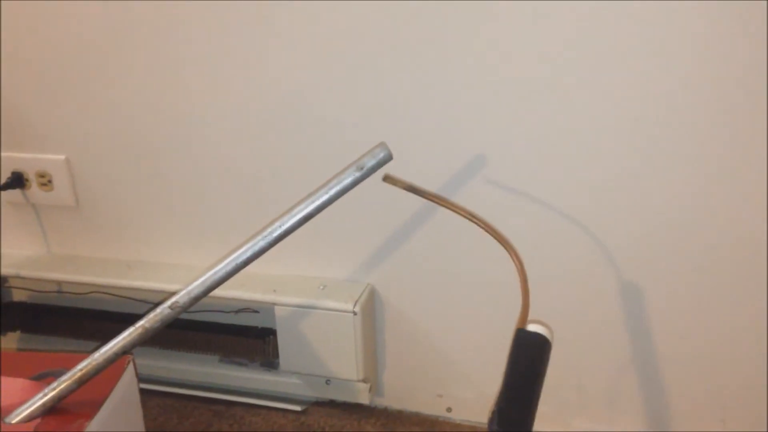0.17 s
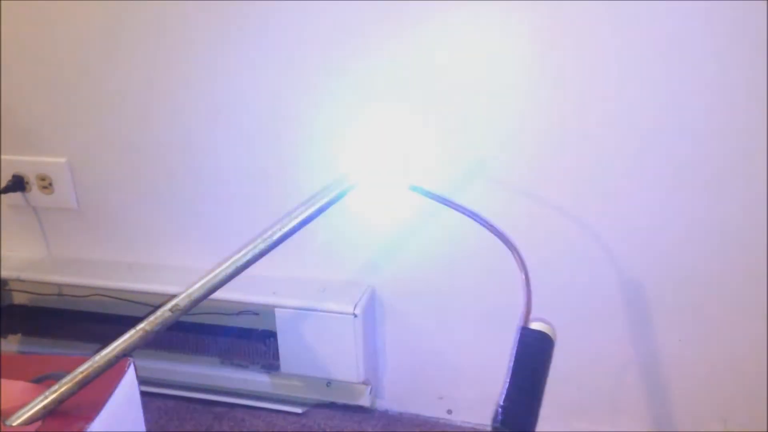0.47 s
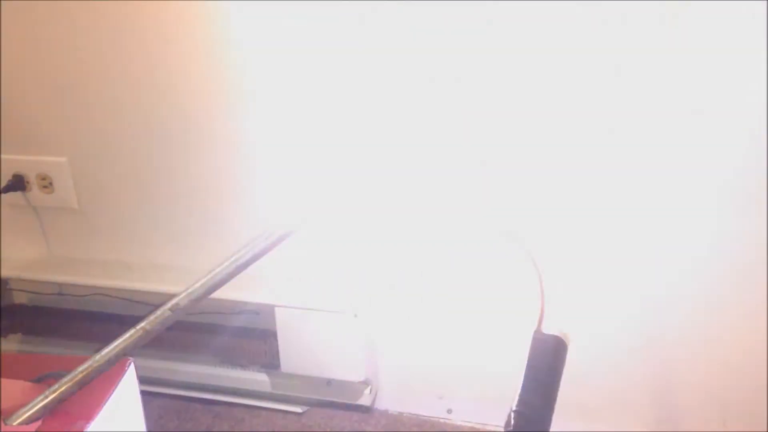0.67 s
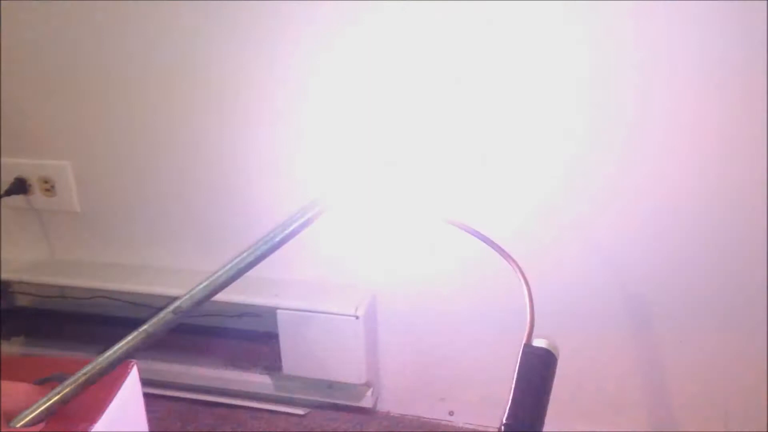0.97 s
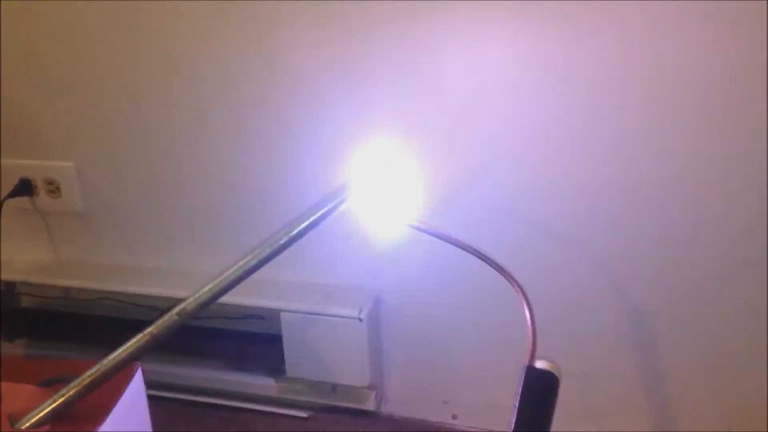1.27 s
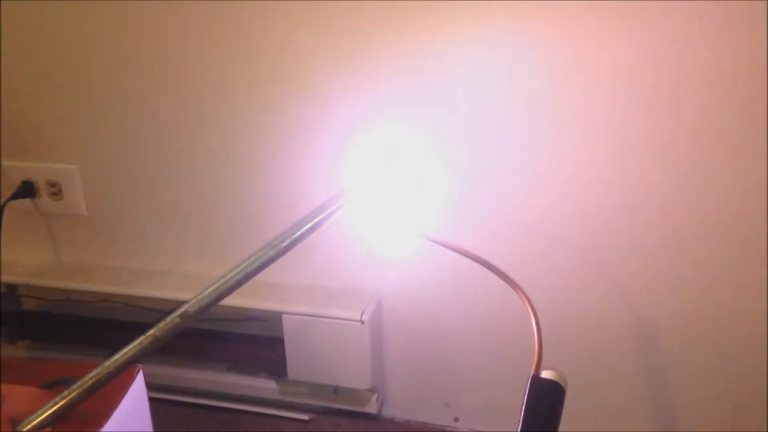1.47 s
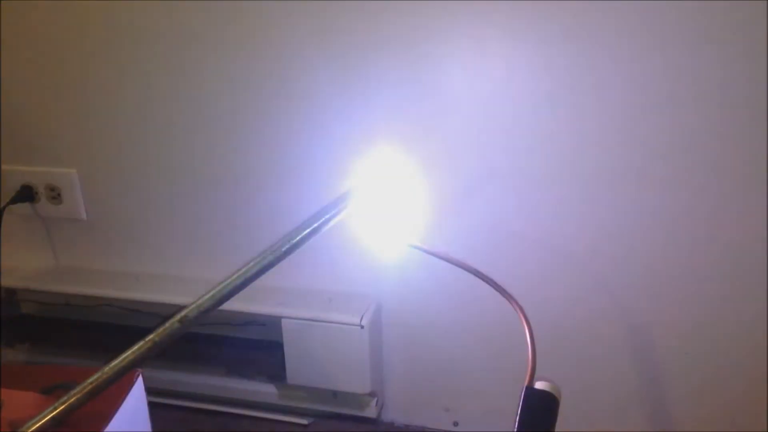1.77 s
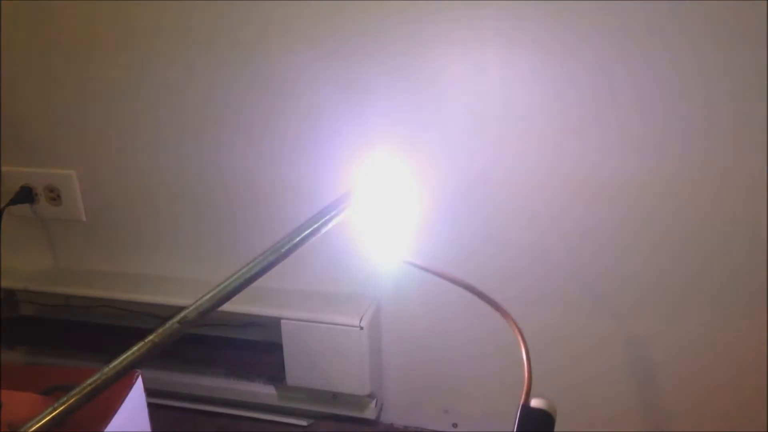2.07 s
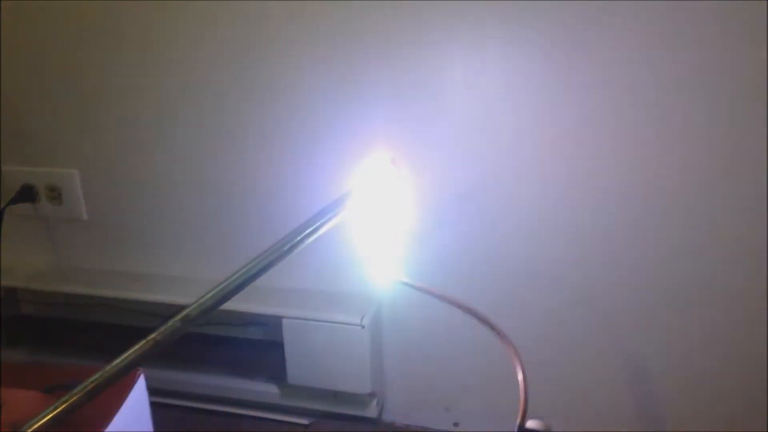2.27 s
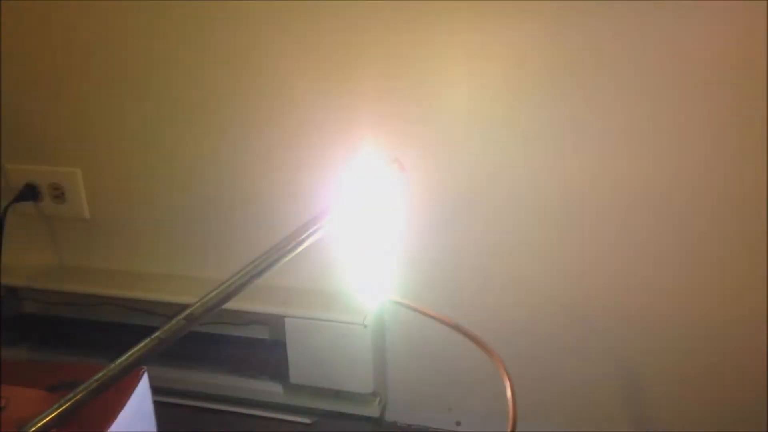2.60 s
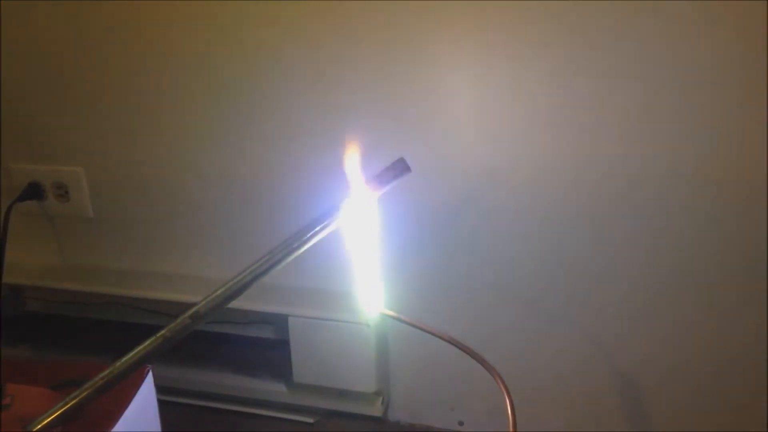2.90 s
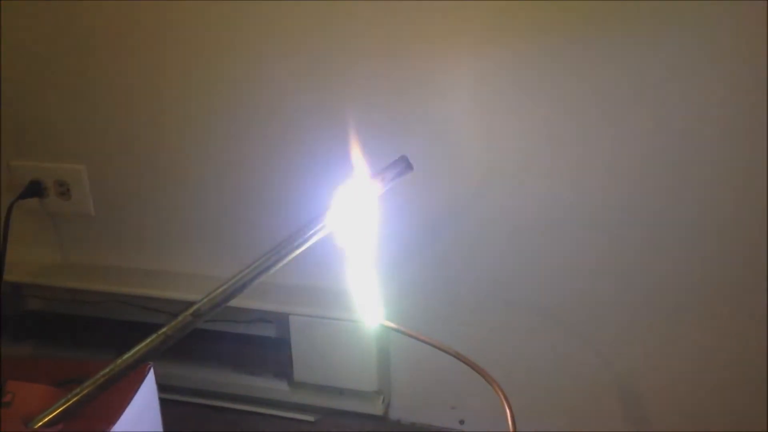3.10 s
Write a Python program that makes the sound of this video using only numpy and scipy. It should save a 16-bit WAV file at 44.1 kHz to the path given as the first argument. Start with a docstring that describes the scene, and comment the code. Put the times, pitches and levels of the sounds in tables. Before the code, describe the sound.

Electric arc buzzing at twice the mains rate, starting faintly after a metallic tick and fizz, soon broken by irregular sharp snaps, swelling loud and fuller to the end; close, mono, in a small hard-walled room.

```python
"""Over quiet room noise and a low transformer hum, a bent wire taps a metal rod: a tick, then a short ring.
The tips sizzle and a high-voltage arc strikes, one pressure pulse per mains half cycle, mirrored by a wall.
Hard relights soon snap, each trailed by churning air, and the arc takes hold with one soft sputter.
As wire and rod part, the arc grows louder and its pulses wider, while the hum swells under load.
Pulses are arctangent shapes, air is coloured noise, the ring is decaying sines; a small room adds its tail."""
import sys
import numpy as np
from scipy import signal
from scipy.fft import rfft, irfft
from scipy.io import wavfile

SR = 44100
rng = np.random.default_rng(int(sys.argv[2]) if len(sys.argv) > 2 else 0)


def store_wav(level_fs):
    """Save 16-bit WAV to argv[1]."""
    pcm = np.round(np.clip(np.atleast_2d(level_fs), -1, 1) * 32767)
    wavfile.write(sys.argv[1], SR, pcm.T.astype(np.int16))


N = 143325

MAINS_HZ = 60
STRIKE_S = .4714

# Strength of the arc, before the trims below: t/s, level/dB
ARC_LEVEL = [(.47, -48.5), (.53, -49), (.6, -37.5), (.66, -32.5), (.74, -33.5), (.78, -27), (.81, -29),
             (.91, -27), (1.03, -29.5), (1.1, -27), (1.16, -29), (1.2, -25.5), (1.25, -26.5), (1.3, -22),
             (1.35, -27), (1.49, -24.5), (1.55, -20), (1.61, -22.5), (1.64, -20), (1.69, -22),
             (1.77, -19.5), (1.84, -20.5), (1.88, -18.5), (1.95, -19.5), (2.05, -20), (2.22, -16),
             (2.27, -14), (2.35, -15), (2.45, -22), (2.6, -15.5), (2.72, -14.5), (2.82, -15.5), (3.02, -16),
             (3.05, -13.5), (3.09, -14.5), (3.24, -14)]
ARC_TRIM_DB, ARC_SCATTER_DB, POLARITY_DB, JITTER_MS = -.5, 1.1, .5, .03
# The arc lengthens and moves; width and edge are before random spread:
# t/s, pulse width/ms, pulse edge/ms, lag of the wall echo/ms
ARC_GROWTH = [(.5, 0.066, 0.11, 1.534), (.9, 0.14, 0.068, 1.5), (1.2, 0.4, 0.046, 1.474),
              (1.9, 0.48, 0.11, 1.49), (2.2, 0.57, 0.11, 1.52), (2.5, 0.63, 0.079, 1.645),
              (2.9, 0.67, 0.13, 1.593), (3.2, 0.8, 0.12, 1.666)]
WALL_GAIN = .62
# Hard relights; level is before the trim: t/s, level/dB, spike edge/ms
HARD_RELIGHTS = [(.705, -21.5, 0.081), (.755, -21, 0.13), (.772, -22, 0.068), (.788, -27, 0.036),
                 (.805, -45, 0.034), (.822, -32, 0.021), (.838, -21, 0.043), (.872, -27, 0.035),
                 (.888, -25.5, 0.042), (.905, -24, 0.034), (.922, -16, 0.08), (.938, -41, 0.057),
                 (.955, -29.5, 0.027), (.972, -18.5, 0.061), (1.088, -18.5, 0.16), (1.188, -21.5, 0.076),
                 (1.338, -16.5, 0.054), (1.355, -25, 0.054), (1.405, -21, 0.045), (1.505, -21, 0.084),
                 (1.538, -26, 0.1), (1.555, -15.5, .085), (1.588, -23, 0.08), (1.755, -17, 0.1),
                 (1.772, -19.5, 0.051), (1.805, -15.5, .055), (1.972, -15.5, 0.041), (2.005, -25, 0.049),
                 (2.022, -19.5, 0.046), (2.038, -13.5, 0.08), (2.072, -25, .055), (2.088, -16.5, 0.06),
                 (2.105, -23.5, 0.052), (2.122, -15.5, 0.077), (2.138, -18.5, 0.08), (2.272, -13.5, 0.068),
                 (2.288, -17.5, .075), (2.322, -24, 0.12), (2.63, -19.5, 0.14), (2.705, -15.5, 0.11),
                 (2.755, -13.5, 0.061)]
SNAP_TRIM_DB = -7.5
# Colour that the nearby surfaces give the arc: f/Hz, gain/dB
SURFACE_COLOUR = [(50, -48), (120, -1.5), (240, -8.5), (360, -4), (480, 2.5), (600, 0.5), (720, -.5),
                  (840, -3.5), (960, 13.5), (1080, 3.5), (1320, 5), (1560, -5.5), (1680, 9), (2100, 4.5),
                  (2400, 0.5), (2760, -8), (3250, 7), (3600, -2.5), (4400, 0.5), (7000, -1.5), (15000, 5.5)]

# Spectrum of the hot air churning after a hard relight: f/Hz, level/dB
CHURN_COLOUR = [(100, -12), (300, -15.5), (550, 4), (1300, 1), (1600, 5), (2000, 2), (2700, -8),
                (3400, -9.5), (5000, -20), (15000, -48)]
# Spectrum of the slow noise that makes the churn ragged: f/Hz, level/dB
FLICKER_COLOUR = [(20, 6.5), (150, -4), (600, -25), (15000, -78)]
CHURN_DB, CHURN_DECAY_S, CHURN_FLICKER_DB = -15.5, .035, 2.5  # level relative to the listed relight

# Sizzle at the tips: t/s, level/dB
SIZZLE_LEVEL = [(.438, -74), (.447, -50), (.465, -54), (.473, -46.5), (.52, -35.5), (.57, -43), (.65, -45),
                (.71, -51), (1.1, -53.5), (1.45, -54.5), (1.9, -53), (2.4, -54.5), (3.24, -56)]
# Spectrum of the sizzle: f/Hz, level/dB
SIZZLE_SPECTRUM = [(500, -7), (2000, -8), (5000, -5), (8000, -4.5), (12000, -3.5), (15000, 2)]
SIZZLE_LAG_MS, SIZZLE_WIDTH_MS = 3.3, 1.25
SIZZLE_WEAK, SIZZLE_STEADY = .22, .51  # opposite-polarity flare and constant part; main flare is 1

# Spectrum of the turbulent hot air: f/Hz, level/dB
FLAME_COLOUR = [(25, -24), (55, -8), (110, -6), (250, -13), (600, -8), (1500, -18), (4000, -35),
                (15000, -50)]
FLAME_DB = -32  # relative to ARC_LEVEL
# Spectrum of the sputter's puff: f/Hz, level/dB
PUFF_COLOUR = [(30, -6), (140, 1), (400, -13), (3000, -32)]
SPUTTER_S, SPUTTER_HISS_DB, SPUTTER_PUFF_DB = .740, -37, -41
HISS_WIDTH_S, PUFF_WIDTH_S = .002, .008

# Ringing modes of rod and wire, before TAP_DB: f/Hz, level/dB, t60/s
RING_MODES = [(111.5, -12.5, 0.38), (292, -9, 0.2), (404, -6, 0.055), (560, -3, 0.14), (610, -14, 0.058),
              (885, -18, 0.092), (5600, -31, .1), (6550, -35, .1), (9530, -26, 0.17), (10500, -29, 0.13)]
# Spectrum of the contact tick: f/Hz, level/dB
TICK_COLOUR = [(200, -7), (1500, 2), (3000, -1.5), (5500, -1), (9000, -3), (15000, -17)]
TAP_S, TAP_DB, TICK_DB, TICK_DECAY_S = .369, -32, -36, .0018

# Colour of the reflections: f/Hz, gain/dB
REVERB_COLOUR = [(100, -14), (500, -14), (1000, -7), (2000, -1), (5000, 1), (15000, -3)]
CLUTTER_DB, CLUTTER_T60_S = -9, .025
ROOM_DB, ROOM_T60_S = -13, .27

# Spectrum of the quiet room: f/Hz, level/dB
FLOOR_COLOUR = [(25, -31), (58, -5.5), (90, -24), (140, -12.5), (300, -24), (500, -14.5), (700, -23),
                (950, -17.5), (1300, -26), (2600, -36), (5300, -38.5), (6300, -32), (7300, -43.5),
                (15000, -40.5)]
FLOOR_DB = -58.5
HUM_DB, HUM_LOADED_DB, HUM_LOADED_S = -66, -57, 2.1
BASS_CUT_HZ, TOP_HZ = 38, 15400


def undb(db):
    """Decibels to amplitude."""
    return 10 ** (np.asarray(db) / 20)


def curve(table, t, axis=1):
    """One column of a table, joined by straight lines in time."""
    rows = np.array(table)
    return np.interp(t, rows[:, 0], rows[:, axis])


def colour(x, points):
    """Minimum-phase filter following f/Hz, gain/dB points: its energy comes as early as causality allows."""
    size = 8192
    hz, db = np.array(points).T
    bins_hz = np.arange(size // 2 + 1) * SR / size
    gain_db = np.interp(np.log(bins_hz + 1), np.log(hz), db)
    # Folding the cepstrum onto positive time makes the response causal
    cepstrum = irfft(np.log(undb(gain_db)))
    cepstrum[1:size // 2] *= 2
    cepstrum[size // 2 + 1:] = 0
    response = irfft(np.exp(rfft(cepstrum)))
    return signal.fftconvolve(x, response)[:len(x)]


def noise(points):
    """Coloured noise of rms 1, taken after the filter has settled."""
    x = colour(rng.standard_normal(2 * N), points)[N:]
    return x / x.std()


def pulse(t, at, width_ms, edge_ms):
    """A rounded negative-going pressure pulse whose area over ms is about 1, so wider means lower."""
    ms = (t - at) * 1000
    edge_ms = max(edge_ms, .015)
    rise = np.arctan((ms + width_ms / 2) / edge_ms)
    fall = np.arctan((ms - width_ms / 2) / edge_ms)
    return -(rise - fall) / (np.pi * width_ms)


def add_with_wall(out, t, at, gain, width_ms, edge_ms):
    """Add one pulse and its later, slightly softer mirror image from the wall just behind."""
    near = slice(int(at * SR) - 600, int(at * SR) + 600)
    lag_s = curve(ARC_GROWTH, at, axis=3) / 1000
    straight = pulse(t[near], at, width_ms, edge_ms)
    mirrored = pulse(t[near], at + lag_s, width_ms, edge_ms + .004)
    out[near] += gain * (straight + WALL_GAIN * mirrored)


def arc(t):
    """The arc relights with one pulse per half cycle; a hard relight adds a needle-sharp spike."""
    out = np.zeros(N)
    times = np.arange(STRIKE_S, t[-1], 1 / (2 * MAINS_HZ))
    chance = rng.standard_normal((len(times), 3))
    times = times + JITTER_MS * chance[:, 0] / 1000
    for k, at in enumerate(times):
        db = curve(ARC_LEVEL, at) + ARC_TRIM_DB + ARC_SCATTER_DB * chance[k, 1]
        db += POLARITY_DB * (-1) ** k
        width_ms = curve(ARC_GROWTH, at) * np.exp(.13 * chance[k, 2])
        # A louder pulse has a sharper edge
        edge_ms = curve(ARC_GROWTH, at, axis=2) * np.exp(-.15 * chance[k, 1])
        add_with_wall(out, t, at, undb(db), width_ms, edge_ms)
    for at, db, edge_ms in HARD_RELIGHTS:
        nearest = times[np.argmin(abs(times - at))]
        add_with_wall(out, t, nearest, undb(db + SNAP_TRIM_DB), .02, edge_ms)
    return colour(out, SURFACE_COLOUR)


def churn(t):
    """Hot air left churning by each hard relight: ragged noise that dies away over a few cycles."""
    power = 0
    for at, db, _ in HARD_RELIGHTS:
        decay = np.exp(-2 * abs(t - at) / CHURN_DECAY_S)
        power = power + undb(db + CHURN_DB) ** 2 * (t > at) * decay
    flicker = undb(CHURN_FLICKER_DB * noise(FLICKER_COLOUR))
    return noise(CHURN_COLOUR) * np.sqrt(power) * flicker


def sizzle(t):
    """Bright hiss at the tips that flares every half cycle, mostly on one polarity."""
    period_ms = 1000 / MAINS_HZ
    ms = (t - STRIKE_S) * 1000 - SIZZLE_LAG_MS

    def flare(ms):
        """A bell-shaped swell once per mains cycle."""
        from_peak = (ms + period_ms / 2) % period_ms - period_ms / 2
        return np.exp(-.5 * (from_peak / SIZZLE_WIDTH_MS) ** 2)

    gate = SIZZLE_STEADY + flare(ms) + SIZZLE_WEAK * flare(ms + period_ms / 2)
    gate = gate / np.sqrt(np.mean(gate ** 2))
    started = t > SIZZLE_LEVEL[0][0]
    return noise(SIZZLE_SPECTRUM) * gate * undb(curve(SIZZLE_LEVEL, t)) * started


def flame(t):
    """Turbulent hot air: low noise that follows the arc's level curve."""
    return noise(FLAME_COLOUR) * undb(curve(ARC_LEVEL, t) + FLAME_DB)


def sputter(t):
    """One soft sputter as the arc takes hold: a brief hiss inside a longer, lower puff of air."""
    def burst(width_s):
        """A bell-shaped swell around the sputter."""
        return np.exp(-.5 * ((t - SPUTTER_S) / width_s) ** 2)

    hiss = undb(SPUTTER_HISS_DB) * noise(SIZZLE_SPECTRUM) * burst(HISS_WIDTH_S)
    puff = undb(SPUTTER_PUFF_DB) * noise(PUFF_COLOUR) * burst(PUFF_WIDTH_S)
    return hiss + puff


def tap(t):
    """Metal meets metal: a noise tick, and rod and wire ring in decaying sine modes."""
    age = np.maximum(t - TAP_S, 0)
    ring = 0
    for hz, db, t60 in RING_MODES:
        ring = ring + undb(db - 60 * age / t60) * np.sin(2 * np.pi * hz * age)
    tick = noise(TICK_COLOUR) * np.exp(-age / TICK_DECAY_S) * (t > TAP_S)
    return undb(TAP_DB) * ring + undb(TICK_DB) * tick


def room(x, t):
    """Quick scatter from nearby clutter and the tail of a small room, both as decaying noise."""
    age = t[:SR // 2]
    echoes = 0
    for db, t60 in (CLUTTER_DB, CLUTTER_T60_S), (ROOM_DB, ROOM_T60_S):
        tail = rng.standard_normal(len(age)) * undb(-60 * age / t60)
        tail = tail * (age > .0012)  # the first reflections need time to arrive
        echoes = echoes + undb(db) * tail / np.linalg.norm(tail)
    return signal.fftconvolve(x, colour(echoes, REVERB_COLOUR))[:N]


def background(t):
    """Steady room noise and the transformer's mains-rate hum, ramped up as the arc loads it."""
    hum_db = np.interp(t, [STRIKE_S, HUM_LOADED_S], [HUM_DB, HUM_LOADED_DB])
    hum = undb(hum_db) * np.sin(2 * np.pi * MAINS_HZ * t)
    return undb(FLOOR_DB) * noise(FLOOR_COLOUR) + hum


def scene():
    """Mix the sources near the rod, their reflections and the background into one channel."""
    t = np.arange(N) / SR
    direct = arc(t) + churn(t) + sizzle(t) + flame(t) + sputter(t) + tap(t)
    return (direct + room(direct, t) + background(t))[None]


def record(dry):
    """Roll off the deepest bass and cut the top steeply."""
    bass_cut = signal.butter(4, BASS_CUT_HZ, "high", fs=SR, output="sos")
    top_cut = signal.ellip(10, .2, 80, TOP_HZ, fs=SR, output="sos")
    return signal.sosfilt(top_cut, signal.sosfilt(bass_cut, dry))


dry = scene()
out = record(dry)
store_wav(out)
```